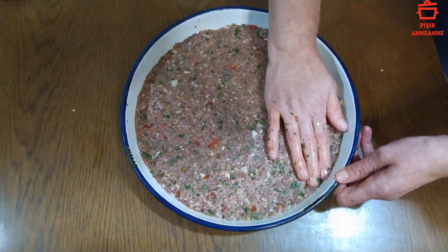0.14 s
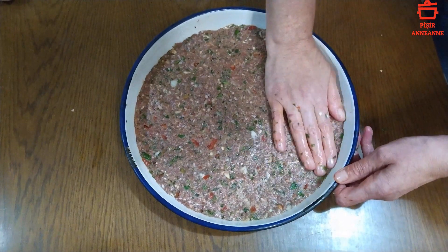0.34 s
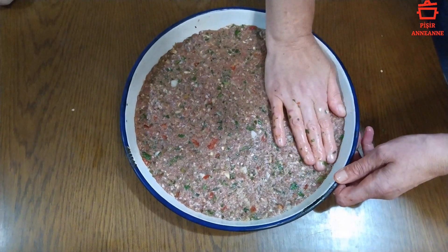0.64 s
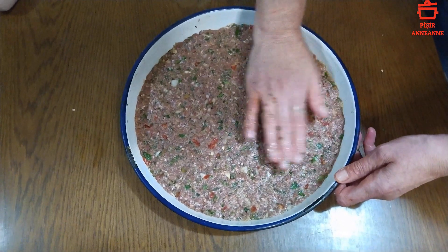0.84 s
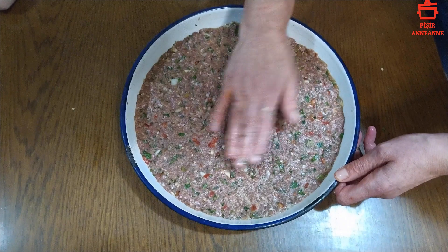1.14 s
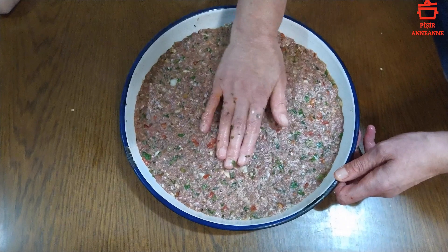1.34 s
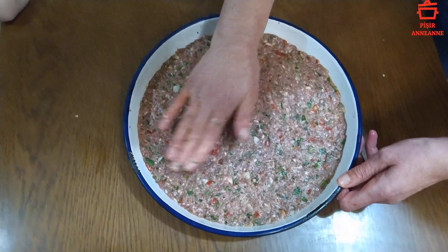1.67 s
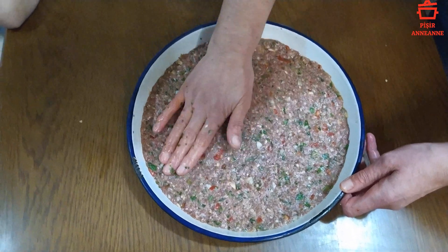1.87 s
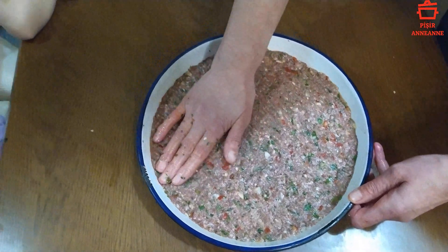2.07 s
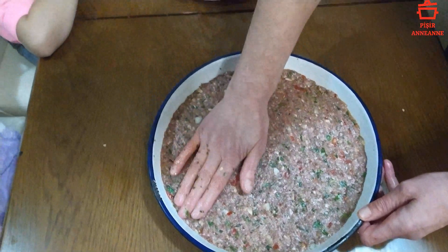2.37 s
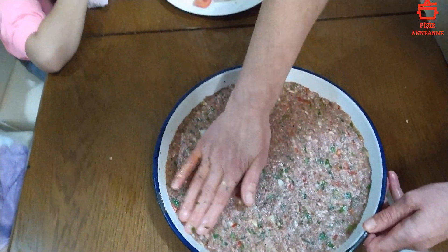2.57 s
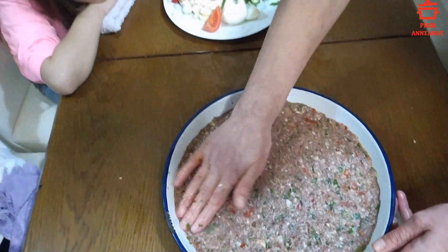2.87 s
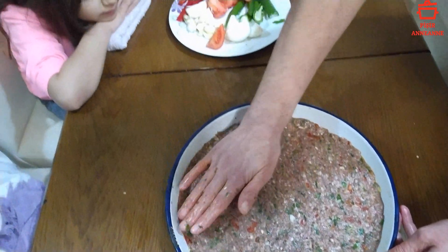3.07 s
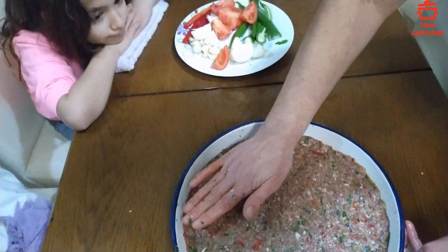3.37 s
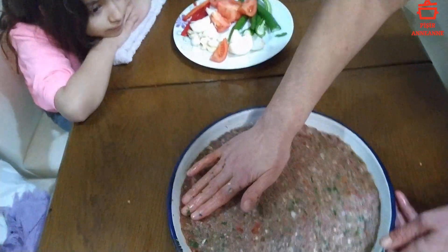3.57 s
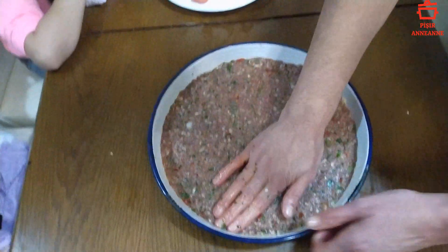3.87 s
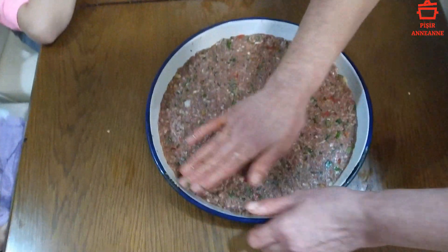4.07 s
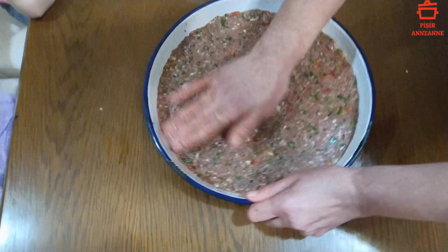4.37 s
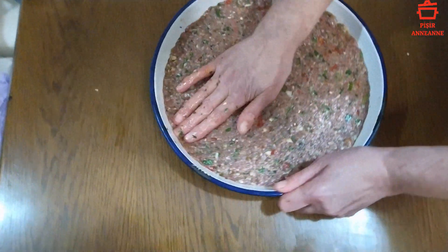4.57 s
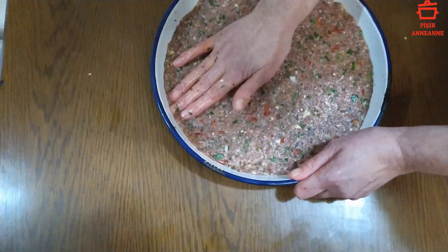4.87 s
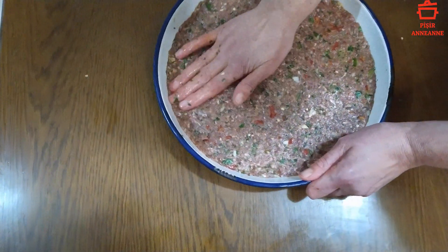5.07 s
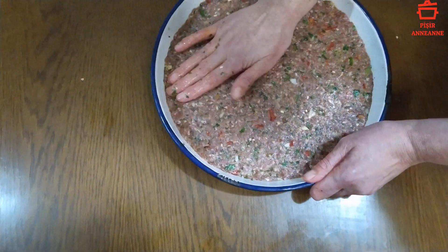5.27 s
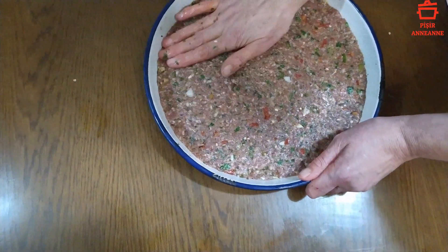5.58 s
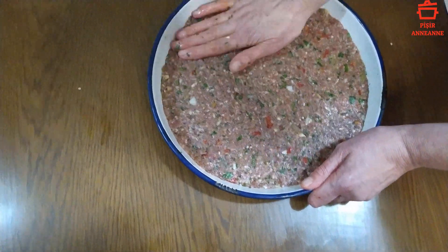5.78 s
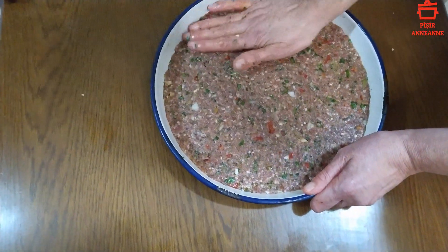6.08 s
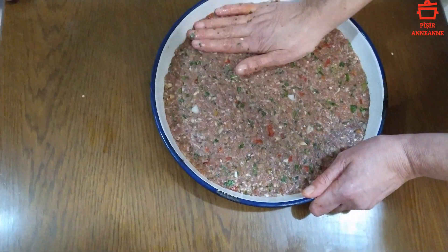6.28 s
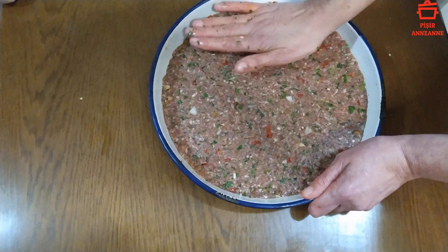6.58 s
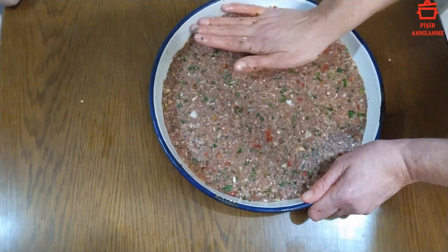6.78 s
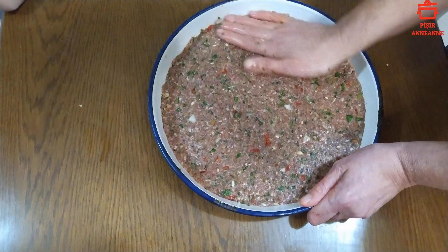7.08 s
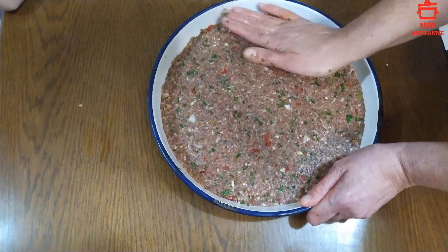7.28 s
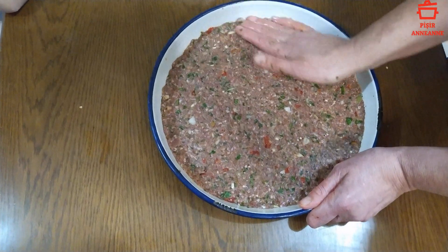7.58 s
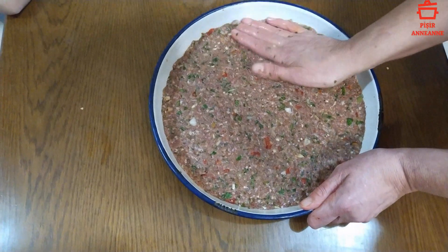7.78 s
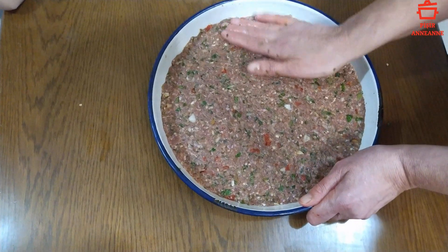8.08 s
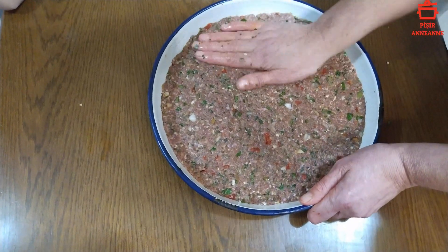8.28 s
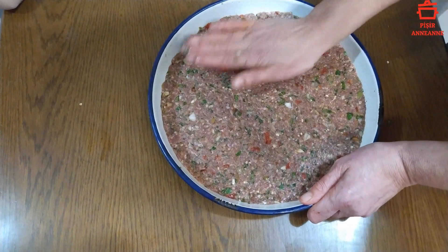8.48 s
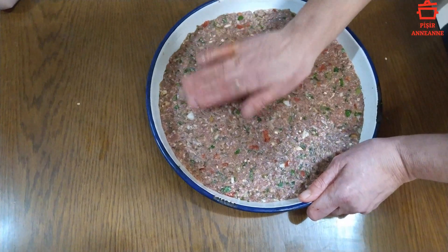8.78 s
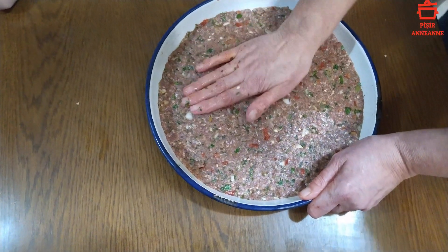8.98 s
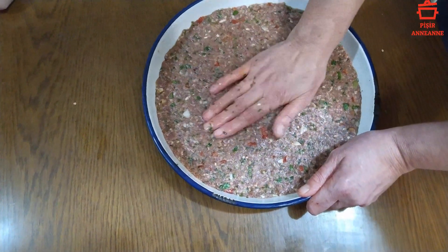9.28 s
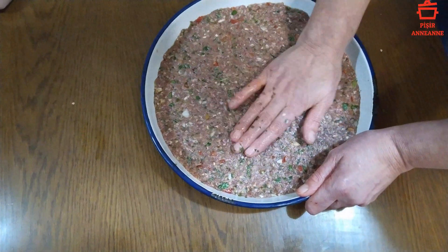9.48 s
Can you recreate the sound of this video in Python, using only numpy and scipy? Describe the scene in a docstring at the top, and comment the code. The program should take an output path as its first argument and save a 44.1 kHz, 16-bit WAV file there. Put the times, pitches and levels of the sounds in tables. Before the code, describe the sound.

A flat wet hand pats raw minced meat in a metal tray, soft thumps alternating with sticky, crackling peels in a quiet kitchen.

```python
"""Over faint room air and a low scuff comes a soft thump: a flat wet hand pats raw minced meat
in a round metal tray on a wooden table in a quiet kitchen. Each pat is noise bursts and popping grains
for the slap, with struck resonators for tray and table; lifting the hand peels sticky threads off in a
crackle of short ringing clicks. Rubbed grains make the tray scuff on the wood, a damped knock sounds
further off, and slow noise below hearing is the sway of the hand-held microphone."""
import sys
import numpy as np
from scipy import signal
from scipy.fft import rfft, irfft
from scipy.io import wavfile

SR = 44100
rng = np.random.default_rng(int(sys.argv[2]) if len(sys.argv) > 2 else 0)


def dump_mix(stems):
    """Bounce the given channels to the path in sys.argv[1] as a 16-bit WAV at rate SR."""
    frames = np.atleast_2d(stems).T  # one column per channel
    limited = np.clip(frames, -1, 1)  # hard clip at full scale
    pcm = np.round(limited * 32767).astype(np.int16)
    wavfile.write(sys.argv[1], SR, pcm)


N = 424683   # length [samples]

# Table legs and top rocking: (frequency [Hz], relative level [dB], free decay t60 [s])
TABLE_ROCKING = [(43.2, -12.5, 0.25), (53.8, 4, 0.2)]
# Table top bending: (frequency [Hz], relative level [dB], free decay t60 [s])
TABLE_BENDING = [(98.95, 1, 0.31), (130, -6, 0.2), (154.4, -2.5, 0.38), (209.7, -1, 0.1)]
# Metal tray: (frequency [Hz], relative level [dB], free decay t60 [s])
TRAY_MODES = [(233, -5.5, 0.1), (277, -10.5, 0.19), (335.6, -5.5, 0.15), (382.2, 5, 0.091),
              (450.5, 1, 0.055), (531.7, -5.5, 0.28), (582, -4.5, 0.11), (626.5, 6, 0.036),
              (733.3, 5, 0.039), (817, -3, 0.08), (933, -14.5, 0.17), (1137, -8.5, 0.1), (1440, -12, 0.12),
              (1750, -52, 0.025)]
# Hand peels off: (start [s], length [s], crackle level [dB], squelch level [dB])
PEELS = [(0.219, 0.08, -55, -63), (0.529, 0.076, -49.5, -57.5), (0.822, 0.092, -52, -58),
         (1.135, 0.089, -51.5, -64.5), (1.442, 0.084, -49.5, -61.5), (1.711, 0.076, -50.5, -59.5),
         (1.954, 0.088, -49.5, -61), (2.225, 0.084, -50, -60), (2.526, 0.091, -52, -60),
         (2.81, 0.071, -50, -60.5), (3.088, 0.082, -53.5, -64.5), (3.37, 0.088, -51, -60),
         (3.628, 0.096, -50, -59.5), (4.035, 0.087, -49.5, -62), (4.386, 0.076, -49.5, -74),
         (4.666, 0.11, -51.5, -55), (4.976, 0.077, -52.5, -58.5), (5.206, .1, -52.5, -62.5),
         (5.406, .09, -53.5, -64), (5.686, 0.084, -54.5, -68), (5.941, 0.044, -52, -61),
         (6.146, 0.063, -52, -65), (6.362, 0.12, -51, -64), (6.554, .105, -53.5, -68),
         (6.808, 0.091, -50.5, -62.5), (7.063, 0.034, -51.5, -58.5), (7.311, 0.051, -53, -65.5),
         (7.552, 0.082, -57, -64), (7.769, 0.037, -62.5, -78), (7.959, 0.056, -53.5, -68),
         (8.156, 0.074, -58, -70), (8.415, 0.14, -50, -65), (8.76, 0.081, -50, -60),
         (9.087, .1, -47.5, -59.5), (9.405, 0.094, -49, -59)]
LANDING_S = 0.005   # first finger to last


def from_db(db):
    """Amplitude follows level logarithmically: 20 dB is a factor of ten."""
    return 10 ** (np.asarray(db) / 20)


def rms_one(x):
    """Normalisation: scales a signal to an effective value of 1."""
    return x / np.sqrt(np.mean(x ** 2) + 1e-20)


def in_time(rows):
    """Linear interpolation: each column after the time becomes one value per sample."""
    s, *columns = np.transpose(rows)
    return [np.interp(np.arange(N) / SR, s, c) for c in columns]


def band(x, low_hz, high_hz):
    """Band limitation: a Butterworth filter passes one range of frequencies."""
    sos = signal.butter(2, [low_hz, high_hz], "band", fs=SR, output="sos")
    return signal.sosfilt(sos, x + 1e-18)


def colour(x, spectrum):
    """Minimum phase: a short filter follows the spectrum; white noise keeps its rms."""
    hz, db = np.transpose(spectrum)
    grid = np.linspace(1, SR / 2, 2049)
    magnitude = from_db(np.interp(np.log(grid), np.log(hz), db))
    cepstrum = irfft(np.log(magnitude))
    # folding the cepstrum onto positive times makes the filter causal
    cepstrum[1:2048] *= 2
    cepstrum[2049:] = 0
    pulse = irfft(np.exp(rfft(cepstrum)))
    return signal.oaconvolve(x, pulse / np.sqrt(np.sum(pulse ** 2)))[:N]


def ring(clicks, hz, t60):
    """Damped resonance: a unit click starts a decaying sine of height 1."""
    r, w = from_db(-60 / (t60 * SR)), 2 * np.pi * hz / SR
    return signal.lfilter([0, np.sin(w)], [1, -2 * r * np.cos(w), r * r], clicks + 1e-18)


def grains(per_s, spread_db):
    """Shot noise: chance clicks of uneven size and sign; rms 1."""
    sizes = from_db(spread_db * np.minimum(rng.exponential(1, N), 4))
    signs = rng.choice([-1, 1], N)
    return rms_one(sizes * signs * (rng.random(N) < per_s / SR))


def pops(per_s, spread_db, low_hz, high_hz, cycles):
    """Granular resonance: shot noise dealt to twelve pitches, each decaying 60 dB in some cycles; rms 1."""
    clicks, dealt = grains(per_s, spread_db), rng.integers(0, 12, N)
    pitches = np.geomspace(low_hz, high_hz, num=12)
    return rms_one(sum(ring(clicks * (dealt == k), hz, cycles / hz) * hz for k, hz in enumerate(pitches)))


def swell(seconds, db, rise_s, fall_s):
    """Exponential build-up and decay: an envelope with the given peak follows each moment."""
    marks = np.zeros(N)
    marks[np.minimum((np.asarray(seconds) * SR).astype(int), N - 1)] = from_db(db)
    t = np.arange(SR // 4) / SR
    shape = (1 - np.exp(-t / rise_s)) * np.exp(-t / fall_s)
    return np.maximum(signal.oaconvolve(marks, shape / shape.max())[:N], 0)


def burst(seconds, db, hold_s, rise_s, fall_s):
    """Finite contact time: an envelope rises, holds and dies away after each moment."""
    out, t = np.zeros(N + SR), np.arange(SR // 8) / SR
    shape = np.minimum(t / rise_s, 1) * np.exp(-np.maximum(t - hold_s, 0) / fall_s)   # hold includes rise
    for s, level_db in zip(seconds, db):
        start = int(s * SR)
        out[start:start + len(t)] += from_db(level_db) * shape
    return out[:N]


def ticks(rows, cycles, spray, spray_s, low_hz, high_hz):
    """Impulsive release: each tick peaks after the given cycles and dies away, with a spray of noise."""
    out, t = np.zeros(N + 600), np.arange(600) / SR
    for (s, db, hz), noise in zip(rows, rng.standard_normal((len(rows), 600))):
        age = t * hz / cycles
        tone = np.sin(2 * np.pi * hz * t) * np.e * age * np.exp(-age)
        spray_envelope = np.e * t / spray_s * np.exp(-t / spray_s)
        mist = spray * band(noise * spray_envelope, low_hz, high_hz)
        start = int(s * SR)
        out[start:start + 600] += from_db(db) * (tone + mist)
    return out[:N]


def strike(modes, seconds, db, contact_s):
    """Modal excitation: a soft, noisy push reaches every mode with a strength of its own."""
    push = swell(seconds, db, contact_s / 4, contact_s) / np.sqrt(contact_s * SR)
    return sum(ring(from_db(mode_db) * push * rng.standard_normal(N), hz, t60) for hz, mode_db, t60 in modes)


def thud(modes, seconds, db, contact_s):
    """Modal impulse response: a smooth push moves low modes in fixed phase, varying by a few dB."""
    out, width = 0, int(contact_s * SR)
    for hz, mode_db, t60 in modes:
        push = np.zeros(N)
        push[(seconds * SR).astype(int)] = from_db(db + mode_db + rng.normal(0, 4.6, len(db)))
        smooth_push = signal.oaconvolve(push, np.hanning(width) * 2 / width)[:N]
        out = out - ring(smooth_push, hz, t60)
    return out


def room_tone():
    """Stationary noise: the quiet room is white noise shaped by a fixed spectrum."""
    # Room tone: (frequency [Hz], relative spectral density [dB per Hz])
    air_spectrum = [(35, -31), (60, 2.5), (200, -24.5), (380, -17), (750, -25), (1000, -23), (1900, -46),
                    (2900, -35), (7500, -35), (12000, -35.5), (15000, -39), (16500, -80)]
    return from_db(-60.5) * colour(rng.standard_normal(N), air_spectrum)


def sway():
    """Infrasound: slow pressure swings below hearing, from the hand that holds the microphone."""
    # Microphone sway: (time [s], level [dB])
    sway_levels = [(0, -38), (.5, -45), (1.2, -38), (4.1, -44), (4.9, -43), (6.5, -39), (8, -45),
                   (9.63, -38.5)]
    return from_db(in_time(sway_levels)[0]) * rms_one(band(rng.standard_normal(N), 6.3, 13.4))


def kitchen(x):
    """Diffuse reverberation: dense echoes as decaying noise, the treble dying away sooner."""
    low_t60_s, treble_t60_s, crossover_hz = 0.53, 0.3, 1660
    t = np.arange(SR // 2) / SR
    noise = rng.standard_normal(SR // 2) * np.minimum(t / 0.0041, 1)
    low = signal.sosfilt(signal.butter(2, crossover_hz, fs=SR, output="sos"), noise)
    echoes = low * from_db(-60 * t / low_t60_s) + (noise - low) * from_db(-60 * t / treble_t60_s)
    return signal.oaconvolve(x, echoes / np.sqrt(np.sum(echoes ** 2)))[:N]


def far_knock():
    """Damped modes: a muffled knock elsewhere in the room, with a dip in air pressure just before it."""
    # Body knocked far off: (frequency [Hz], relative level [dB], decay t60 [s])
    far_modes = [(253, 0, 0.048), (308, 2.5, 0.057), (420, 0, 0.056), (470, -9, 0.044), (550, -3.5, 0.074),
                 (620, -2, 0.041), (680, -2.5, 0.048), (794, 2, 0.028), (870, -8, 0.032),
                 (1020, -17, 0.033), (1860, -13, 0.046), (1949, -17, 0.12), (3300, -15, 0.023)]
    # Door-like pull on the room air, one row: (centre [s], 1/e half-width [s], depth [dB])
    pressure_dip = 7.542, .006, -28
    s, width_s, db = pressure_dip
    dip = from_db(db) * np.exp(-((np.arange(N) / SR - s) / width_s) ** 2)
    return strike(far_modes, [7.545], -31, contact_s=0.035), -dip


def shifting():
    """Stick-slip friction: uneven rubbing on the wood feeds the same tray and table modes."""
    # Tray drags on the wood: (time [s], scuff level [dB], table rumble level [dB])
    drags = [(0, -59, -44.5), (.48, -58.5, -49.5), (1.69, -64, -57.5), (2.04, -56, -53), (2.45, -66, -57),
             (3.45, -67, -46.5), (3.66, -48.5, -40), (3.82, -46, -50), (3.92, -60, -49), (4.13, -54.5, -42),
             (4.55, -52, -50.5), (4.9, -56.5, -54), (5.3, -56, -52.5), (5.55, -70, -54), (5.85, -58, -51),
             (6.11, -79, -63), (6.3, -65, -42.5), (6.7, -65, -55), (6.92, -58, -46), (7.3, -68, -59),
             (8.37, -74, -60.5), (8.93, -63.5, -40), (9.63, -58.5, -56)]
    scuff_db, rumble_db = in_time(drags)
    grip = from_db(1.4 * rms_one(band(rng.standard_normal(N), 5.7, 31)))   # the contact sticks and slips
    rub = grip * grains(4000, spread_db=3.0)

    # under rubbing the modes ring for only a share of their free decay
    scuff = rms_one(sum(from_db(db) * ring(rub, hz, t60 * 0.5) for hz, db, t60 in TRAY_MODES))
    scuff = scuff + 0.47 * rms_one(band(rub, 770, 2240)) + 0.17 * rms_one(band(rub, 1530, 7900))
    rocking = rms_one(sum(from_db(db) * ring(rub, hz, t60 * 0.28) for hz, db, t60 in TABLE_ROCKING))
    bending = rms_one(sum(from_db(db) * ring(rub, hz, t60 * 0.22) for hz, db, t60 in TABLE_BENDING))
    return from_db(scuff_db) * scuff + from_db(rumble_db) * (rocking + 0.16 * bending)


def nudges():
    """Modal excitation: the steadying hand or a sleeve nudges the tray into ringing."""
    # Nudges: (time [s], drive level [dB])
    nudge_rows = [(0.368, -50.5), (2.454, -55), (2.685, -54), (2.982, -48.5), (3.481, -48), (4.303, -46.5),
                  (4.552, -44), (5.599, -56), (5.845, -60), (7.167, -59.5), (8.863, -53.5), (9.212, -48.5)]
    return strike(TRAY_MODES, *np.transpose(nudge_rows), contact_s=0.01)


def tearing(level_db):
    """Progressive rupture: tearing grows louder, levels off and stops as the hand comes free."""
    build_share, build_db, let_go_s = 0.51, 8, 0.0067   # share of the peel spent rising; rise; final decay
    out, t = np.zeros(N + SR), np.arange(SR // 4) / SR
    for (s, length_s), db in zip(np.array(PEELS)[:, :2], level_db):
        rise = from_db(db + build_db * np.minimum(t / (build_share * length_s) - 1, 0))
        release = np.exp(-np.maximum(t - length_s, 0) / let_go_s)
        start = int(s * SR)
        out[start:start + len(t)] += rise * release
    return out[:N]


def squelch():
    """Cavity resonance: grains in the air gap under the palm climb in pitch as the gap opens."""
    # Air gap pitch, one row: (as it starts to open [Hz], when it is open [Hz])
    cavity_hz = 1250, 2126
    start, length_s = np.transpose(PEELS)[:2]
    moments = np.ravel(np.transpose([start, start + length_s]))
    hz = np.interp(np.arange(N) / SR, np.maximum.accumulate(moments), np.tile(cavity_hz, len(start)))
    # low-passed grains on two quadrature carriers make a band around the moving pitch
    breadth = signal.butter(2, 380, fs=SR, output="sos")
    turn = 2 * np.pi * np.cumsum(hz) / SR
    a, b = (signal.sosfilt(breadth, grains(600, spread_db=3.0)) for _ in "ab")
    return rms_one(a * np.cos(turn) + b * np.sin(turn))


def chance_snaps():
    """Random rupture: three more snaps in each peel, at chance moments and pitches."""
    over_crackle_db, spread_db, low_hz, high_hz = 19, -0.5, 7500, 13000
    s, length_s, crackle_db = np.repeat(PEELS, 3, axis=0).T[:3]
    when, size, pitch = rng.random((len(s), 3)).T
    snap_db = crackle_db + over_crackle_db + spread_db * (2 * size - 1)
    snap_hz = low_hz * (high_hz / low_hz) ** pitch
    return np.transpose([s + when * length_s, snap_db, snap_hz])


def peel():
    """Adhesive rupture: fat threads tear as fine crackle, trapped air squelches, snaps and smacks stand out."""
    # Crackle: (frequency [Hz], relative spectral density [dB per Hz])
    crackle_spectrum = [(2000, -34), (3000, -14), (4500, -7), (6500, -2), (8500, -2), (11800, 0),
                        (14500, -6), (15800, -14), (16600, -40)]
    # Sticky threads snap: (time [s], tone peak level [dB], pitch [Hz])
    thread_snaps = [(0.5576, -29, 11800), (0.8859, -30, 10390), (0.8974, -28.5, 11600), (1.0504, -37, 8140),
                    (1.1403, -38, 11500), (1.1603, -30, 9230), (1.1992, -29, 11500), (1.2152, -30, 10900),
                    (1.4326, -36, 11600), (1.4656, -24.5, 7140), (1.4784, -27, 10800), (1.506, -32, 11800),
                    (1.7424, -28, 9900), (1.7878, -29.5, 7800), (2.0014, -31, 8480), (2.2079, -38.5, 9400),
                    (2.2692, -32, 8660), (2.3077, -31, 7400), (2.4887, -34.5, 9160), (2.6254, -27, 8440),
                    (2.8724, -41, 11200), (3.1148, -33, 9370), (3.4007, -34, 7660), (3.6501, -31, 8820),
                    (3.6985, -36, 10200), (3.7134, -26.5, 11700), (4.0886, -29, 11000),
                    (4.4004, -30, 10800), (4.4268, -31, 8230), (4.4373, -27.5, 8060), (4.6828, -42, 11100),
                    (4.7132, -27.5, 10900), (4.7767, -30, 11600), (5.001, -26.5, 10700),
                    (5.026, -27.5, 12200), (5.206, -31.5, 7760), (5.2754, -31, 8000), (5.3002, -33, 8030),
                    (5.4096, -44, 7810), (5.4266, -39, 8430), (5.4892, -32, 8190), (5.9818, -30.5, 11270),
                    (6.4203, -35, 11600), (6.6189, -30, 11600), (6.8678, -39, 10700), (7.8361, -31, 8750),
                    (8.1953, -33.5, 7440), (8.2362, -30, 7700), (8.4497, -31, 11300), (8.7764, -30, 10700),
                    (8.7959, -26.5, 11000), (9.1107, -29, 9200), (9.1426, -30.5, 11300),
                    (9.1674, -36.5, 11900), (9.4404, -40, 11900), (9.4674, -28, 12100),
                    (9.4893, -26.5, 10600)]
    # Suction pockets under the palm open with a smack: (time [s], tone peak level [dB], pitch [Hz])
    pockets = [(0.2564, -32.5, 1260), (0.5796, -31, 2570), (0.8993, -42, 2280), (1.1624, -35.5, 2320),
               (1.191, -37.5, 1390), (1.4618, -39, 1780), (1.495, -36.5, 1520), (1.7572, -34.5, 1680),
               (2.0073, -38, 1340), (2.2629, -38.5, 1660), (4.4277, -34, 3460), (4.453, -35, 3370),
               (4.7282, -34, 1760), (4.7427, -41, 1810), (5.0142, -40, 1640), (5.7425, -39.5, 1600),
               (6.1818, -41.5, 1983), (6.4277, -38, 2100), (6.6143, -43, 2220), (6.8633, -42, 2330),
               (8.506, -35, 1890), (8.8186, -36, 1750), (9.1538, -36, 1970), (9.1673, -36, 1800)]
    crackle_db, squelch_db = np.transpose(PEELS)[2:]
    threads = pops(2200, spread_db=5.5, low_hz=2750, high_hz=16600, cycles=5.8)
    crackle = tearing(crackle_db) * rms_one(colour(threads, crackle_spectrum))
    suction = tearing(squelch_db) * squelch()
    all_snaps = [*thread_snaps, *chance_snaps()]
    snaps = ticks(all_snaps, cycles=1.56, spray=0.27, spray_s=0.0012, low_hz=5830, high_hz=15100)
    smacks = ticks(pockets, cycles=0.86, spray=0.65, spray_s=0.0029, low_hz=860, high_hz=4100)
    return crackle + suction + snaps + smacks


def claps(seconds, db, pitch_hz):
    """Air expulsion: air trapped under the cupped palm bursts out in a noise band around its own pitch."""
    width = 1.49   # the band spans the pitch divided and multiplied by this
    out, puffs = np.zeros(N + 2000), rng.standard_normal((len(seconds), 2000))
    for s, hz, puff in zip(seconds, pitch_hz, puffs):
        start = int(s * SR)
        out[start:start + 2000] = rms_one(band(puff, hz / width, hz * width))
    return out[:N] * burst(seconds, db, LANDING_S, rise_s=0.0027, fall_s=0.0013)


def pats():
    """Impact on coupled bodies: fingers land over milliseconds; meat, tray and table answer later and longer."""
    # Hand lands: (time [s], slap level [dB], cupped-air clap level [dB], clap pitch [Hz],
    # squish level [dB], tray drive level [dB], table drive level [dB])
    landings = [(0.096, -56, -63, 1200, -70, -47.5, -34.5), (0.406, -41.5, -47.5, 1200, -67, -58.5, -45.5),
                (0.7146, -33, -36.5, 2420, -56, -42, -38), (1.0287, -36.5, -39.5, 1240, -51.5, -37.5, -31),
                (1.3337, -40.5, -41.5, 1140, -46.5, -38.5, -37.5), (1.6266, -41, -37, 1200, -54, -40, -40),
                (1.8708, -38.5, -35.5, 1260, -47, -35.5, -36), (2.126, -42, -41.5, 1660, -47, -39, -35.5),
                (2.7261, -32, -42.5, 1150, -64, -48, -38.5), (3.011, -28, -32, 850, -58, -38, -34),
                (3.2837, -36.5, -46, 910, -54.5, -43, -37.5),
                (3.547, -23, -31.5, 2730, -40.5, -34.5, -38.5), (3.9674, -51, -55, 1490, -59, -58, -42),
                (4.2764, -48, -48.5, 2770, -55, -57, -40.5), (4.5862, -28.5, -34.5, 1780, -52, -39, -41),
                (4.8812, -46.5, -45.5, 1230, -66, -53.5, -45), (5.1363, -40, -48, 900, -60, -53.5, -42),
                (5.3597, -40.5, -53, 900, -53.5, -45.5, -37.5), (5.5932, -56, -58, 1190, -76, -58, -63),
                (5.8466, -49.5, -59.5, 1210, -81, -69, -47), (6.069, -42, -50, 900, -65, -55, -46.5),
                (6.2706, -29.5, -33, 2080, -51.5, -39.5, -39.5),
                (6.7346, -28.5, -33, 2000, -57, -42, -33.5), (6.955, -49, -50.5, 905, -59.5, -48, -38.5),
                (7.708, -48.5, -55.5, 2300, -74, -73, -46.5), (7.8967, -39.5, -44, 920, -59.5, -50, -37),
                (8.098, -27, -44, 910, -62, -43.5, -37.5), (8.3861, -27.5, -27, 980, -47, -40, -37.5),
                (8.6758, -38.5, -31, 1130, -57, -41, -39), (8.9647, -41, -34.5, 1070, -56, -42.5, -40),
                (9.3009, -41.5, -38.5, 930, -58, -44.5, -33), (9.5883, -34, -39.5, 1310, -61, -43.5, -34.5)]
    # Slap: (frequency [Hz], relative spectral density [dB per Hz])
    slap_spectrum = [(1500, 1), (2500, -5), (3400, -2), (5000, -1), (7200, 1.5), (10500, -2.5), (15000, -6),
                     (16500, -48)]
    s, slap_db, clap_db, clap_hz, squish_db, tray_db, table_db = np.transpose(landings)

    contacts = pops(2500, spread_db=3.0, low_hz=3120, high_hz=15200, cycles=8.9)
    contacts = rms_one(colour(contacts, slap_spectrum))
    slap = contacts * burst(s, slap_db, LANDING_S, rise_s=0.0028, fall_s=0.0013)
    clap = claps(s + 0.00156, clap_db, clap_hz)
    # meat squeezed aside under the palm
    flesh = pops(2500, spread_db=3.0, low_hz=750, high_hz=1900, cycles=7.0)
    squish = flesh * swell(s + LANDING_S, squish_db, rise_s=0.002, fall_s=0.041)

    tray = strike(TRAY_MODES, s + 0.0023, tray_db, contact_s=0.013)
    bending = thud(TABLE_BENDING, s + 0.0043, table_db, contact_s=0.0047)
    rocking = thud(TABLE_ROCKING, s + 0.0044, table_db + 2, contact_s=0.0078)   # driven 2 dB harder
    return slap + clap + squish, tray + bending + rocking


def scene():
    """Superposition: direct sounds add to their reverberation; the bodies feed the room in mid-band only."""
    knock, dip = far_knock()
    slaps, bodies = pats()
    bodies = bodies + nudges()
    bright = slaps + peel()
    room = from_db(-10) * kitchen(bright + band(bodies, 177, 2400) + knock)
    background = room_tone() + sway() + dip + shifting()
    return (background + knock + room + bodies + bright)[None]


def record(dry):
    """Band limitation: a steep low-pass leaves almost nothing above 16.6 kHz."""
    return signal.sosfilt(signal.cheby2(12, 70, 16600, fs=SR, output="sos"), dry)   # 70 dB down there


dry = scene()
out = record(dry)
dump_mix(out)
```